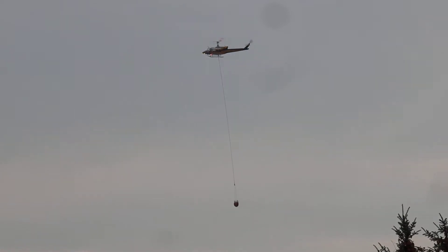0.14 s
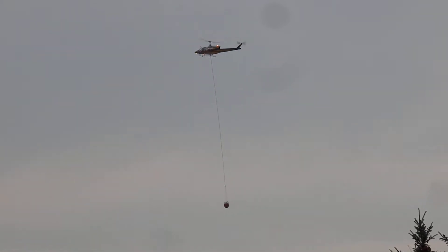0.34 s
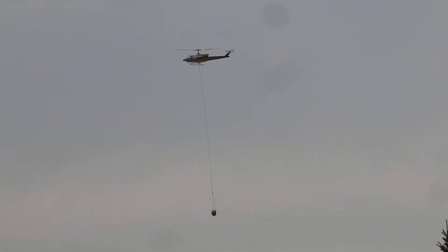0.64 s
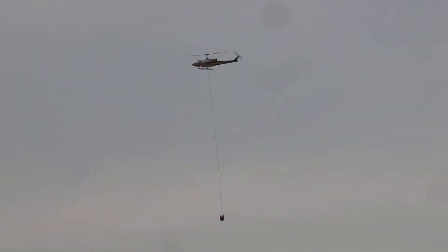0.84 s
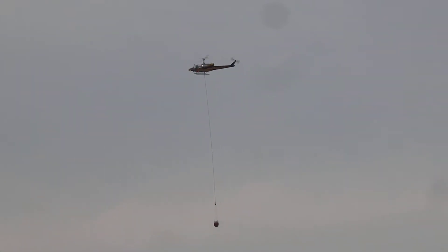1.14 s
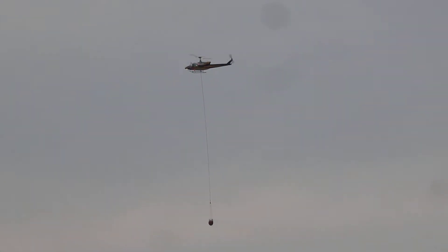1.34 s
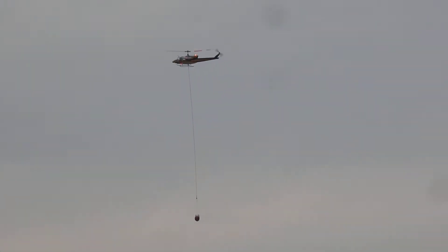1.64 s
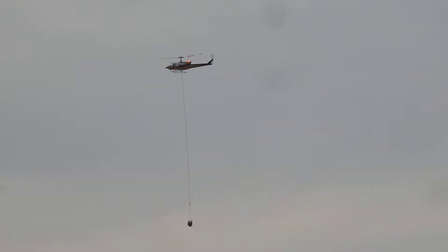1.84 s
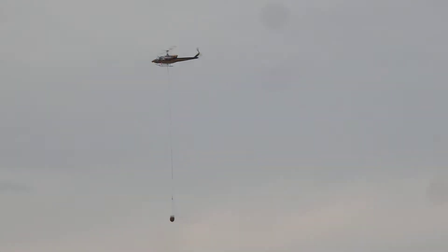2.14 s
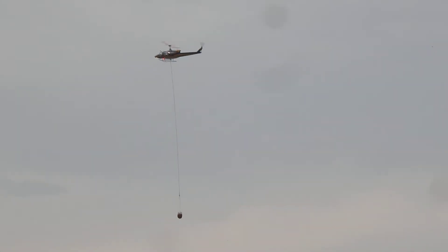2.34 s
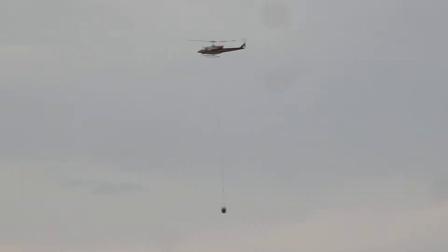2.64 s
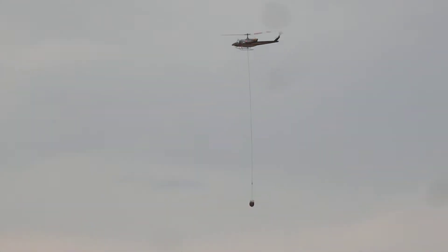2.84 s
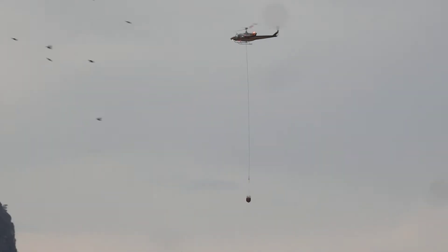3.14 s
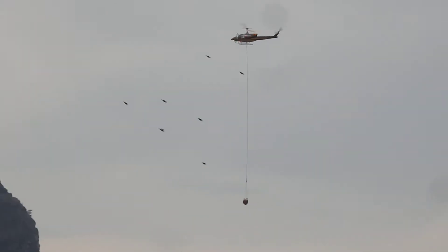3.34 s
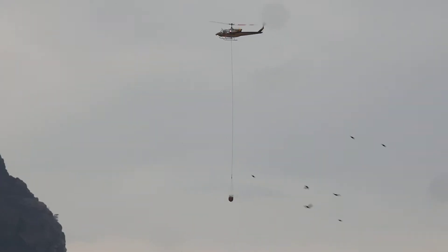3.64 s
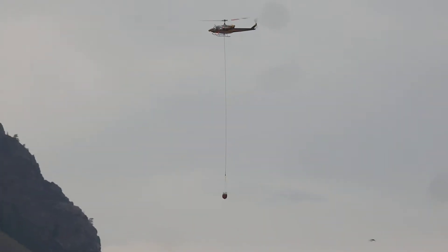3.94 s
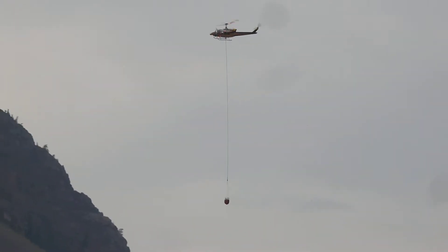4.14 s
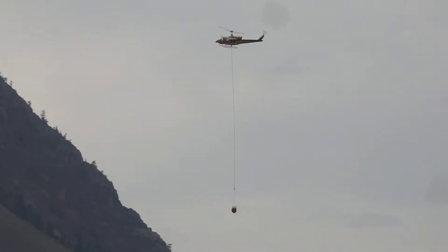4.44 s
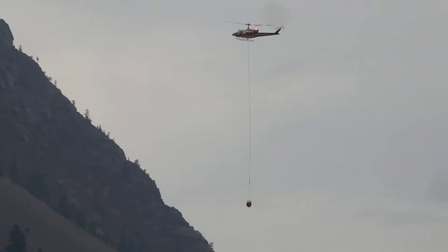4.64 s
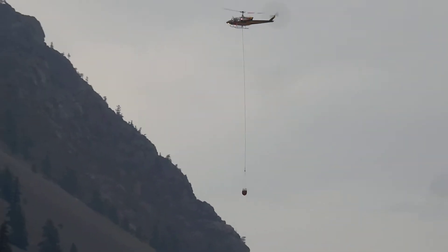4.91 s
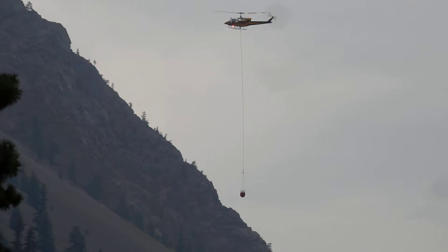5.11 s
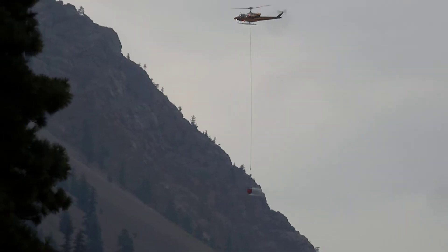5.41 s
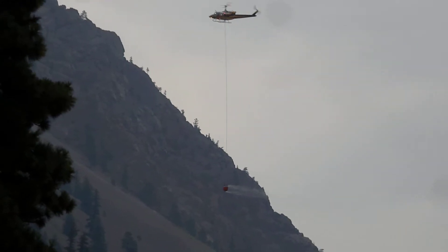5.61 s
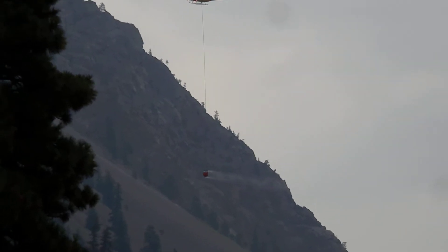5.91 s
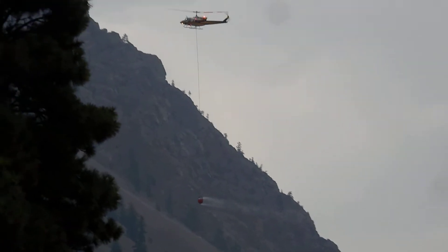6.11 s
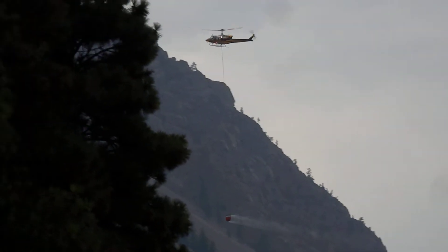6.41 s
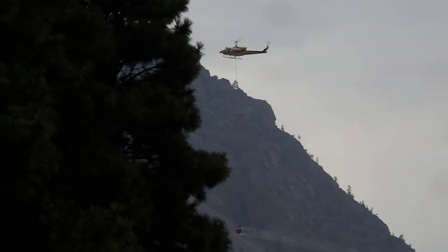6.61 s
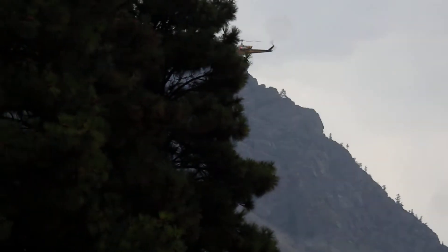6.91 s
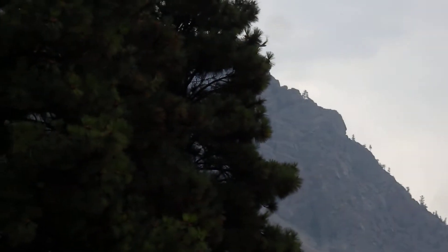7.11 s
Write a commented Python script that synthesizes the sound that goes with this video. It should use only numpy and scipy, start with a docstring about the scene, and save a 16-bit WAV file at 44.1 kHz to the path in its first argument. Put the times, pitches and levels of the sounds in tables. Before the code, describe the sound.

A helicopter flies past outdoors, its thumping rotor, buzzing tail and turbine roar growing louder while wind buffets the microphone.

```python
"""Helicopter over a mountain valley

A two-blade helicopter passes: tail-rotor slaps buzz over the thump and swish of the main rotor and
the turbine's roar, all combed by the ground echo. Wind buffets the right microphone, dry rustles
come from the left, and the whole level keeps dropping with a tick and climbing back."""
import sys
import numpy as np
from scipy import signal
from scipy.fft import rfft, irfft
from scipy.io import wavfile
from scipy.ndimage import uniform_filter1d

SR = 44100
rng = np.random.default_rng(int(sys.argv[2]) if len(sys.argv) > 2 else 0)


def wav_record(signal):
    """Record a signal, one row per channel, as 16-bit PCM in the file named by sys.argv[1]."""
    frames = np.transpose(np.atleast_2d(signal))
    bounded = np.clip(frames, -1, 1)
    # unit amplitude maps onto the largest positive 16-bit level
    quanta = np.round(bounded * 32767).astype(np.int16)
    wavfile.write(sys.argv[1], SR, quanta)


N = 320166
TIME = np.arange(N) / SR
GEAR = 5.11  # tail blade passes per main blade pass


def gain_of(db):
    return 10 ** (np.asarray(db) / 20)


def unit_rms(x):
    return x / np.sqrt(np.mean(x ** 2) + 1e-20)


def read(points, hz):
    """A spectrum, straight lines on a log axis."""
    f, value = np.transpose(points)
    return np.interp(np.log(hz + 1), np.log(f + 1), value)


def curve(rows, column=1):
    """One column of a timed table at every sample."""
    rows = np.asarray(rows)
    return np.interp(TIME, rows[:, 0], rows[:, column])


def swell(at_s, width_s):
    """A bell curve in time, peaking at 1."""
    return np.exp(-((TIME - at_s) / width_s) ** 2)


def panned(db):
    """Stereo gains with the left louder by db."""
    return gain_of([[db / 2], [-db / 2]])


def delayed(x, ms):
    """A copy that lags by a slowly changing time."""
    return np.interp(np.arange(N) - ms * SR / 1000, np.arange(N), x)


def noise(spectrum, likeness, patchy_db, size=512):
    """Two partly alike channels of coloured noise with drifting patches."""
    frames, hz = 4 * N // size + 5, np.fft.rfftfreq(size, 1 / SR)
    a, b, c, d, patches = rng.standard_normal((frames, len(hz), 5)).T
    patches = unit_rms(uniform_filter1d(uniform_filter1d(patches, size=6, axis=0), size=12, axis=1))
    alike = np.clip(read(likeness, hz), -1, 1)[:, None]
    left = a + 1j * b
    right = alike * left + np.sqrt(1 - alike ** 2) * (c + 1j * d)
    bins = np.array([left, right]) * gain_of(read(spectrum, hz)[:, None] + patchy_db * patches)
    return unit_rms(signal.istft(bins, nperseg=size, noverlap=3 * size // 4)[1][:, :N])


def coloured(x, spectrum):
    """Causal filter: the phase follows from the log gain."""
    hz = abs(np.fft.fftfreq(8192, 1 / SR))
    log_gain = np.log(gain_of(np.maximum(read(spectrum, hz), -100)))
    taps = np.fft.ifft(np.exp(np.conj(signal.hilbert(log_gain)))).real[:4096]
    return signal.oaconvolve(x, taps)[:N]


# The helicopter's fader ride. Each row: time in seconds, level in dB.
PASS_LEVEL = [(0, -34), (.5, -29), (1, -30.5), (1.5, -32.5), (2, -28), (2.4, -32.5), (2.8, -28), (3.2, -23),
              (3.7, -25.5), (4.3, -20), (5, -22), (5.6, -23.5), (6, -20.5), (6.5, -24.5), (6.9, -21),
              (7.26, -22.5)]
def ride(db, share):
    """Gain of a layer that follows a share of the fader ride, sitting at db when the ride is at -25."""
    return gain_of(db + share * (curve(PASS_LEVEL) + 25))


# Moving air makes the sound arrive late or early. Each row: time in seconds, lag in ms.
AIR_LAG = [(0, -.7), (.5, .45), (.9, .85), (1.5, .9), (2, .6), (2.5, .15), (3.1, .35), (3.8, .15), (4.5, 0),
           (5, .4), (5.45, .85), (6, .6), (6.4, .45), (6.75, .15), (7.26, .55)]
def blade_passes():
    """Running counts of main and tail blade passes, Doppler-shifted as the path grows, then shrinks."""
    tail_hz = 57.9
    path_m = 4.17 * TIME - .309 * TIME ** 2 / 2 - .271 * TIME ** 3 / 6
    tail = .51 + tail_hz * (TIME - path_m / 343 - curve(AIR_LAG) / 1000)
    main = tail / GEAR
    # The main wake hurries and delays the tail slaps, less and later as the view of the rotors turns.
    sway_ms = (.5 - .022 * TIME) * np.cos(2 * np.pi * (main - .73 - .04 * TIME))
    return main, tail + tail_hz * sway_ms / 1000


def throb(passes, depth, lead=-.07):
    """Louder each time a main blade sweeps toward the listener; lead is in parts of a blade pass."""
    angle = 2 * np.pi * (passes + lead)
    facing = np.cos(angle + .6 * (1 - np.cos(angle)))  # skewed, so the beat is lopsided
    deepen = 1 + .12 * TIME
    return gain_of(depth * deepen * (np.exp(0.35 * (facing - 1)) - 1.04))


# Stereo image of the helicopter's noise. Each row: frequency in Hz, left-right likeness up to 1.
LIKENESS = [(60, 0.99), (300, 1), (600, 0.96), (1000, 0.97), (1600, 0.72), (2600, 0.47), (6000, 0.087)]
# The main rotor's low end. Each row: frequency in Hz, level in dB.
RUMBLE_EQ = [(15, -42), (32, -15), (55, -4.5), (120, -3.5), (200, -11.5), (290, -9), (400, -15.5),
             (800, -103)]
def rotor_rumble(main):
    """Low noise that thumps with each main blade and sags once in level."""
    level = ride(-24.5 - 4.5 * swell(at_s=2.25, width_s=0.4), share=0.28)
    return noise(RUMBLE_EQ, LIKENESS, patchy_db=2.0, size=2048) * throb(main, depth=12.0) * level


# Tone of one slap. Each row: frequency in Hz, level in dB.
SLAP_EQ = [(25, -30), (120, -17), (290, -12.5), (400, -2.5), (500, -0.5), (590, 2.5), (660, -1.5),
           (780, -8.5), (900, -19.5), (1300, -26.5), (2200, -52), (4000, -100)]
# Slaps with their own accent. Each row: time in seconds, dB against a usual slap.
SLAP_ACCENTS = [(.323, -2), (.621, 0), (.708, -7), (.796, 4.5), (1.406, 2), (1.462, 3), (2.139, 7),
                (2.226, 5.5), (2.538, 3.5), (2.628, 4.5), (2.852, 1), (2.921, 0), (3.13, 4), (3.2, 1),
                (3.217, 1), (3.286, 4), (3.304, 3), (3.338, -2.5), (3.65, 4), (3.685, 0), (3.737, 1.5),
                (3.806, 0.5), (3.964, 1.5), (3.996, 1.5), (4.014, 0), (4.049, -2), (4.083, 0.5), (4.308, 2),
                (4.325, -0.5), (4.342, -0.5), (4.532, 0), (4.791, 5), (4.86, 5), (5.24, 2.5), (5.326, 1.5),
                (5.412, 2.5), (5.498, 3.5), (5.601, 5), (5.687, 4), (5.841, 2), (5.927, 4), (6.099, 4),
                (6.03, 3), (6.116, 1.5), (6.134, 4.5), (6.201, 1), (6.372, 1.5), (6.458, 3.5), (6.714, 3.5),
                (6.731, 4.5), (7.089, 6), (7.14, 0), (7.157, 6.5), (7.226, 0.5)]
# A later echo of the slaps. Each row: time in seconds, lag in ms, signed gain.
SLAP_ECHO = [(0, 8.08, -0.37), (2.4, 8.22, -0.36), (2.9, 8.34, -0.42), (4.3, 8.16, -0.39), (5, 8.35, 0.22),
             (7.26, 8.6, 0.25)]
def tail_slaps(tail):
    """One slap per tail blade pass, swelling as it cuts the main rotor's wake, then a later echo."""
    at = np.flatnonzero(np.diff(np.floor(tail)) > 0)
    size, jitter = rng.standard_normal((len(at), 2)).T
    size_db = .9 * size
    for s, db in SLAP_ACCENTS:
        size_db[np.argmin(abs(at - s * SR))] = db
    hits = np.zeros(N)
    hits[np.clip(at + np.round(2.5 * jitter).astype(int), 0, N - 1)] = gain_of(size_db)
    slaps = coloured(hits * throb(tail / GEAR, depth=7.0, lead=.03), SLAP_EQ)
    echo = curve(SLAP_ECHO, column=2) * delayed(slaps, curve(SLAP_ECHO))
    return unit_rms(slaps + echo) * gain_of(curve(PASS_LEVEL))


# The tail rotor's clean low tones, each swelling once. Each row: harmonic number, base level in dB,
# swell in dB, its centre in seconds, its width in seconds.
HUM_TONES = [(1, -36.5, 11.5, 7.6, 3.8), (2, -38.5, 1.5, 1.7, 0.93), (3, -39, 9.5, 3.54, 1.2),
             (4, -39.5, 10.5, 6.84, 1.25), (5, -49, 12, 3.8, 0.73), (6, -52.5, 9, 7.5, 0.66),
             (8, -54, 19, 5.4, .8)]
def tail_hum(tail):
    """Sines on multiples of the tail blade rate, throbbing with the main rotor."""
    tones = sum(gain_of(db + swell_db * swell(s, width)) * np.cos(2 * np.pi * round(harmonic) * tail)
                for harmonic, db, swell_db, s, width in HUM_TONES)
    return np.sqrt(2) * tones * throb(tail / GEAR, depth=2.2)


# The main rotor's airy midrange. Each row: frequency in Hz, level in dB.
SWISH_EQ = [(150, -30), (300, -29), (420, -21.5), (550, -10.5), (700, -13.5), (850, -19.5), (1200, -22.5),
            (2000, -60.5), (4000, -71)]
def rotor_swish(main, chop):
    """The main rotor's wake, pulsing with its blades and chopped by the tail blades."""
    wake = noise(SWISH_EQ, LIKENESS, patchy_db=0.71)
    return wake * throb(main, depth=6.6) * (2.23 + 3.67 * chop) * ride(-35.5, share=.9)


# Tone of the exhaust roar and of the whine. Each row: frequency in Hz, level in dB.
ROAR_EQ = [(300, 6), (700, -13), (1000, -2), (1600, -6), (2200, -14), (3000, -23), (3800, -28.5),
           (6000, -42.5), (9000, -62)]
WHINE_EQ = [(2000, -4), (2900, 6), (3600, -10.5), (4300, -1.5), (4750, -7.5), (5200, -10.5), (5600, -10.5),
            (6000, -9), (7000, -33)]
# The whine's fader ride. Each row: time in seconds, level in dB.
WHINE_LEVEL = [(0, -55), (.4, -61), (.8, -66), (6.1, -55.5), (6.5, -55.5), (6.8, -39.5), (7.26, -45)]
def turbine(main, chop):
    """Exhaust roar, pulsed by both rotors, under a hissy whine that comes forward near the end."""
    exhaust = noise(ROAR_EQ, LIKENESS, patchy_db=2.2)
    roar = exhaust * throb(main, depth=5.3) * (0.95 + 1.27 * chop) * ride(-32, share=0.67)
    whine = noise(WHINE_EQ, LIKENESS, patchy_db=3.8) * gain_of(curve(WHINE_LEVEL))
    return roar + whine


# Strength of the ground bounce. Each row: time in seconds, gain.
GROUND_GAIN = [(0, 0.62), (2.2, 0.74), (2.9, 0.83), (7.26, 0.85)]
def ground_echo(direct, late_s):
    """A dull reflection that combs the direct sound; its lag grows late in the pass."""
    lag_ms = 1.933 + 0.21 * late_s
    dull = signal.lfilter(*signal.butter(2, 1000, fs=SR), direct)  # the ground returns little treble
    return curve(GROUND_GAIN) * np.array([delayed(side, lag_ms) for side in dull])


# The wash off the slopes. Each row: frequency in Hz, level in dB.
SCATTER_EQ = [(300, 1), (700, -12.5), (950, 2), (1300, -2), (1600, -1.5), (2200, -14), (2800, -18),
              (3800, -33), (6000, -44), (9000, -69)]
def slope_scatter(late_s):
    """Roar scattered by the slopes fills the comb's upper notches, more so late in the pass."""
    return noise(SCATTER_EQ, LIKENESS, patchy_db=2.14) * ride(-31.5 + 0.85 * late_s, share=0.67)


# Tone of the buffeting. Each row: frequency in Hz, level in dB.
BUFFET_EQ = [(12, -43), (28, -17), (82, -0.5), (130, 1), (310, -9.5), (500, -24.5), (700, -29), (1300, -56),
             (2500, -100)]
# The wind's fader ride on the right. Each row: time in seconds, level in dB.
WIND_LEVEL = [(0, -15.5), (.1, -19), (.5, -19.5), (.85, -14), (1.15, -22.5), (1.5, -31.5), (1.75, -16),
              (2.27, -11.5), (2.3, -17), (2.55, -23), (2.8, -32.5), (3.35, -39.5), (4.0, -32.5),
              (4.45, -26.5), (4.6, -13), (5.2, -18), (5.5, -15), (5.93, -19), (6.07, -28), (6.22, -18),
              (6.75, -18.5), (6.9, -22), (7.1, -33), (7.26, -27)]
# Gusts on top of that ride. Each row: centre in seconds, boost in dB, width in seconds.
WIND_GUSTS = [(.32, 7, 0.021), (.48, 8, 0.055), (.775, 2.5, 0.023), (1.04, 7, 0.048), (1.27, 8, 0.013),
              (1.35, 12, 0.083), (1.57, 14, 0.12), (1.79, 5.5, 0.028), (1.871, 16.5, 0.022),
              (2.04, 11, 0.057), (2.191, 14.5, 0.01), (2.267, 10.5, 0.009), (2.82, 7, 0.027),
              (4.32, 9, 0.04), (4.57, -1.5, .03), (4.72, -0.5, 0.021), (5.1, -2, 0.036), (5.4, 3.5, 0.072),
              (5.6, 3, 0.01), (5.67, 5.5, 0.02), (5.89, 8.5, 0.027), (6.17, 3, 0.021), (6.28, 4, 0.024),
              (6.4, 2, 0.034), (6.67, 6.5, 0.026), (6.8, -1, .03)]
def wind():
    """Pressure eddies thump the right microphone over a rumble; a trace of others reaches the left."""
    eddies_per_s, left_db = 130, -20.5
    chance, size = rng.random((N, 2)).T, rng.standard_normal((N, 2)).T
    eddies = size * (chance < eddies_per_s / SR)
    thumps = unit_rms(np.array([coloured(side, BUFFET_EQ) for side in eddies]))
    rumble = noise(BUFFET_EQ, [(10, -.1), (1000, .1)], patchy_db=2.2, size=1024)
    gust_db = sum(db * swell(s, width) for s, db, width in WIND_GUSTS)
    level = gain_of(curve(WIND_LEVEL) + gust_db) * gain_of([[left_db], [0]])
    return (.75 * thumps + .65 * rumble) * level


# The dry, papery top of rustle and crackles. Each row: frequency in Hz, level in dB.
LEAF_EQ = [(1500, -14), (3500, -1), (5000, 5.5), (7500, 5), (9500, -3), (11500, -9), (16000, -20)]
# The rustle's fader ride. Each row: time in seconds, level in dB.
RUSTLE_LEVEL = [(0, -66), (1.2, -62.5), (2, -61.5), (3.1, -63), (3.35, -52), (3.7, -60.5), (4.35, -48.5),
                (4.7, -53), (4.95, -59.5), (5.5, -56), (5.7, -52), (5.85, -64), (6.6, -57.5), (7.26, -58)]
def rustle():
    """A faint, patchy rustle of leaves, a little to the left."""
    leaves = noise(LEAF_EQ, [(10, 0.28), (9000, 0.085)], patchy_db=3.1, size=256)
    return leaves * gain_of(curve(RUSTLE_LEVEL)) * panned(3.6)


# Faint whistles. Each row: centre in seconds, width in seconds, pitch in Hz, band in Hz, level in dB.
TURBINE_WHISTLES = [(.25, .17, 5200, 450, -67), (.33, .15, 3500, 300, -66), (6.8, .2, 4300, 350, -60),
                    (6.75, .12, 2950, 250, -57), (7.1, .12, 2800, 250, -57)]
def turbine_whistles():
    """Fuzzy tones from the turbine: narrow bands of noise that swell and fade."""
    out = np.zeros(N)
    for s, width, hz, band_hz, db in TURBINE_WHISTLES:
        flutter = signal.lfilter(*signal.butter(2, band_hz / 2, fs=SR), rng.standard_normal(N))
        out += gain_of(db) * swell(s, width) * unit_rms(flutter * np.cos(2 * np.pi * hz * TIME))
    return out


# Tone of one crack. Each row: frequency in Hz, level in dB.
CRACK_EQ = [(500, -39), (1200, -4), (2000, 11), (2900, -2), (4200, -43), (8000, -69)]
# Crack cues. Each row: start in seconds, peak level in dB.
BLADE_CRACKS = [(.3556, -35), (.639, -27), (0.6976, -24.5), (1.3375, -34), (1.8038, -37), (2.3511, -29),
                (2.5616, -30), (2.824, -31), (3.1002, -18), (3.1987, -22), (3.724, -32), (3.8416, -24),
                (4.39, -19.5), (4.504, -18.5), (4.551, -21), (4.6933, -18), (4.7212, -19), (6.156, -35),
                (6.3056, -26)]
def blade_cracks():
    """Sharp cracks from the blades: single clicks ringing briefly near 2 kHz."""
    clicks = np.zeros(N)
    for s, db in BLADE_CRACKS:
        clicks[round(s * SR)] = gain_of(db)
    filter_peak = abs(coloured(signal.unit_impulse(4096), CRACK_EQ)).max()
    return coloured(clicks, CRACK_EQ) / filter_peak


# Crackle cues. Each row: time of the snap in seconds, level in dB, left over right in dB.
DRY_CRACKLES = [(2.145, -49, 13), (2.3506, -52, 6), (2.5785, -50, 16), (2.588, -46, 1.5), (2.6354, -53, 10),
                (2.8579, -51, 8), (2.878, -47.5, 13), (3.0046, -51, 12), (4.4104, -47, 17),
                (4.585, -33.5, 10), (4.7507, -32, 11), (5.3667, -46, .5), (5.6336, -45, 8), (5.657, -45, 4),
                (5.7194, -52.5, 5)]
def crackles():
    """Dry crackles close by, each a sharp snap inside a brief swell of tiny ones."""
    snap_s, swell_s, lead_samples = 0.0033, 0.021, 1500
    t = np.arange(-lead_samples, 2500) / SR
    shape = (t > 0) * np.exp(-abs(t) / snap_s) + 0.17 * np.exp(-abs(t) / swell_s)
    bursts = np.zeros((2, N))
    for s, db, pan_db in DRY_CRACKLES:
        grit = rng.standard_normal(len(t)) * gain_of(0.96 * rng.standard_normal(len(t) // 20).repeat(20))
        start = round(s * SR) - lead_samples
        bursts[:, start:start + len(t)] += gain_of(db) * panned(pan_db) * shape * unit_rms(grit)
    filter_gain = np.linalg.norm(coloured(signal.unit_impulse(4096), LEAF_EQ))
    return np.array([coloured(side, LEAF_EQ) for side in bursts]) / filter_gain


# How the microphone pair leans. Each row: frequency in Hz, left over right in dB.
STEREO_LEAN = [(60, -1.5), (900, -.5), (1700, 0.5), (2300, -4.5), (3200, -2.5), (5000, -1.5)]
def helicopter():
    """Both rotors and the turbine, heard directly, off the ground and off the slopes."""
    main, tail = blade_passes()
    late_s = np.maximum(TIME - 4.43, 0)  # seconds into the late part of the pass
    chop = uniform_filter1d(np.exp(-(tail % 1) / 0.28), size=40)  # one pulse per tail blade
    direct = rotor_rumble(main) + tail_slaps(tail) + blade_cracks()
    direct += rotor_swish(main, chop) + turbine(main, chop)
    mix = direct + ground_echo(direct, late_s)
    mix += tail_hum(tail) + turbine_whistles() + slope_scatter(late_s)
    lean_db = read(STEREO_LEAN, np.fft.rfftfreq(N, 1 / SR))
    return irfft(rfft(mix) * gain_of([lean_db / 2, -lean_db / 2]), N)


def scene():
    """The helicopter, with wind and dry leaves close by."""
    return helicopter() + wind() + rustle() + crackles()


# Microphone hiss. Each row: frequency in Hz, level in dB.
HISS_EQ = [(500, -10), (3000, 4), (6000, 3), (10000, .5), (16000, -2.5)]
# Sudden drops of the whole mix. Each row: start in seconds, gain just after in dB,
# tick in dB against the sound around it.
LEVEL_DROPS = [(0.3637, 3, -7), (0.501, 0.5, -10), (0.798, -1, -11), (1.0677, -1, -6), (1.4465, 0.5, -8),
               (1.593, -2.5, -11), (1.8542, -6.5, -12), (2.0865, -3.5, -8), (2.2758, -4.5, -9),
               (2.9393, 3, -3), (3.0252, 1, -2.5), (3.375, -0.5, -1), (3.8136, 8.5, -5), (3.824, 0, -6),
               (4.086, -.5, -7), (4.354, 0.2, -28), (4.533, 1, -5), (4.601, 2.5, 2), (4.621, -3, -10),
               (4.7906, -1.5, -15), (4.966, -3, -5), (5.438, 0.5, -13), (5.6003, 1, -5), (5.755, -3, -8),
               (5.926, -2, -12), (6.2075, -1, -28), (6.46, -2, -4), (6.731, -0.5, -7), (6.815, -4.5, -6),
               (7.1545, -1.5, -2)]
def record(dry):
    """Adds hiss, a level that drops with a thin tick and climbs back, soft clipping and a top cut."""
    hiss_db, climb_db_per_s, ceiling_db, cutoff_hz = -60, 17, 10, 15800
    hiss = gain_of(hiss_db) * noise(HISS_EQ, [(10, 0.13), (9000, 0.067)], patchy_db=0.51, size=256)
    drop_s, after_db, _ = np.transpose([(0, 0, 0)] + LEVEL_DROPS)
    latest = np.searchsorted(drop_s, TIME, "right") - 1
    level_db = np.minimum(after_db[latest] + climb_db_per_s * (TIME - drop_s[latest]), ceiling_db)
    out = (dry + hiss) * gain_of(uniform_filter1d(level_db, size=40))
    local_rms = np.sqrt(abs(uniform_filter1d(out ** 2, size=SR // 2)))
    tick = np.exp(-np.arange(400) / 18.0)  # a sudden jump that sinks back
    for s, _, tick_db in LEVEL_DROPS:
        at = round(s * SR)
        out[:, at:at + 400] += gain_of(tick_db) * local_rms[:, at, None] * tick * rng.choice([-1, 1])
    out = out / (1 + abs(out) ** 4) ** .25  # soft knee below full scale
    lowpass = signal.firwin(511, cutoff_hz, window=("kaiser", 9), fs=SR)
    return signal.oaconvolve(out, lowpass[None], "same")


dry = scene()
out = record(dry)
wav_record(out)
```